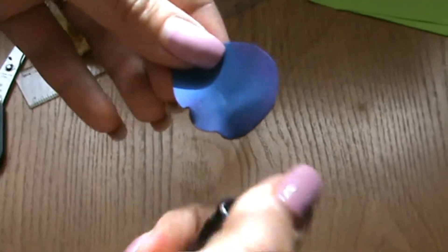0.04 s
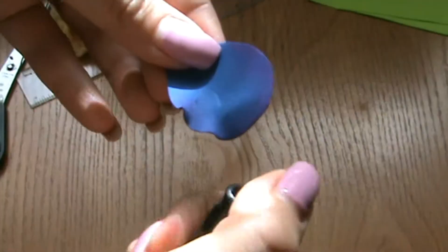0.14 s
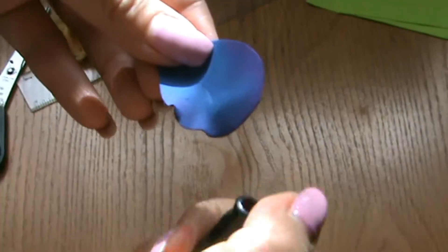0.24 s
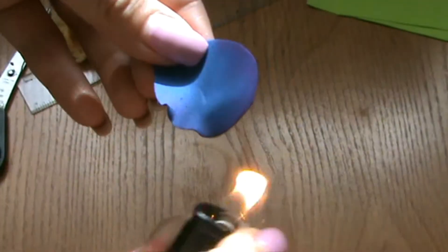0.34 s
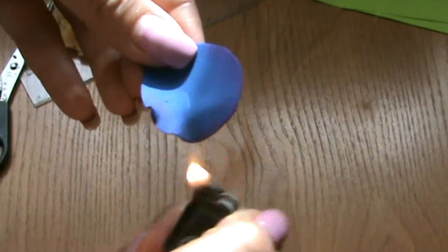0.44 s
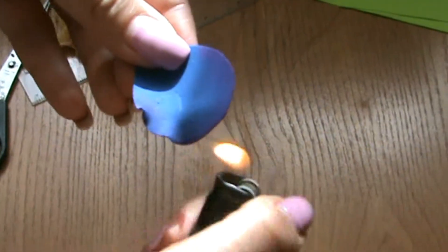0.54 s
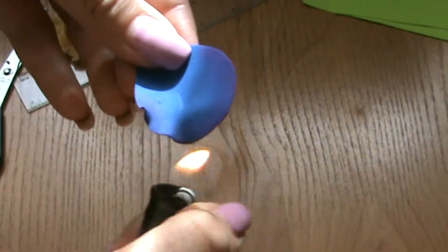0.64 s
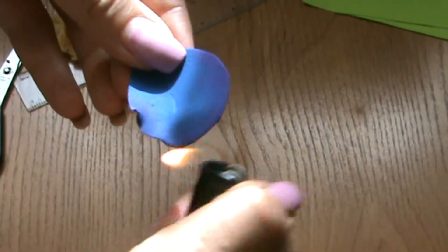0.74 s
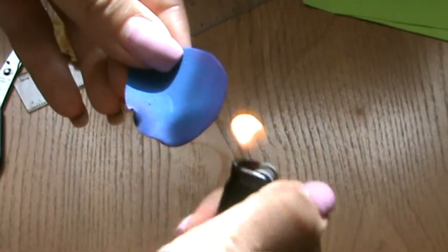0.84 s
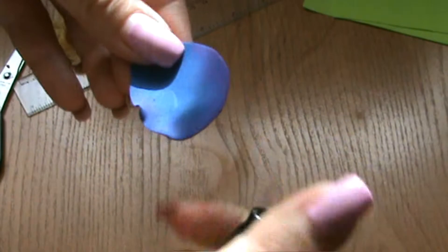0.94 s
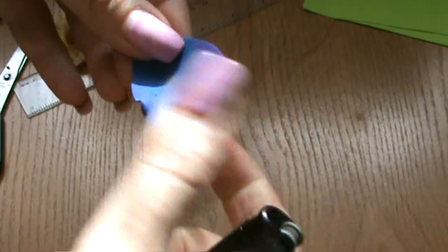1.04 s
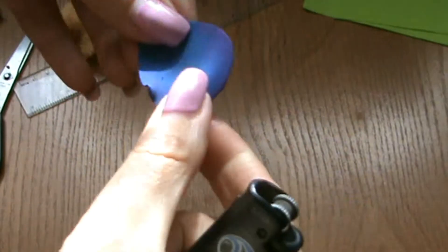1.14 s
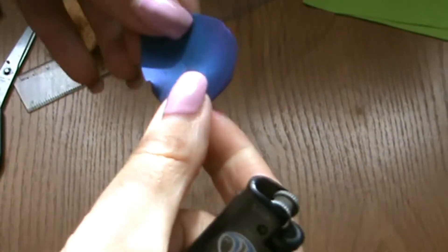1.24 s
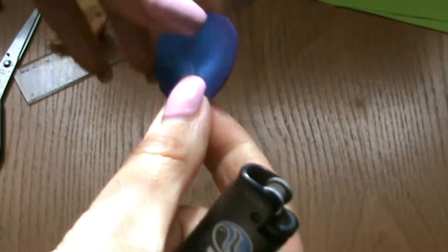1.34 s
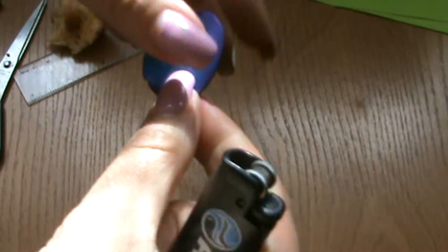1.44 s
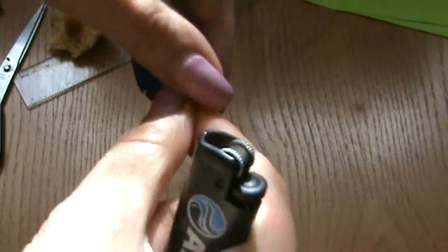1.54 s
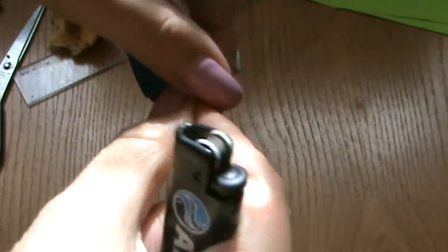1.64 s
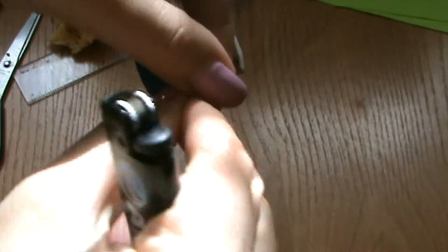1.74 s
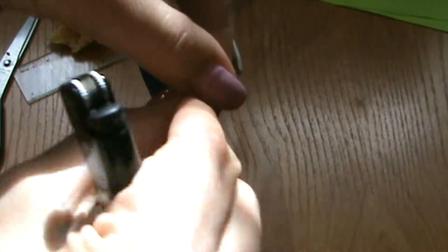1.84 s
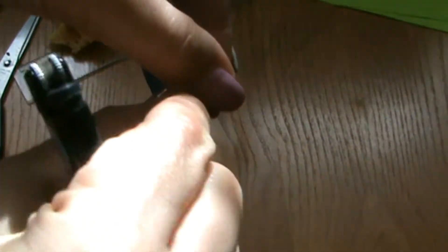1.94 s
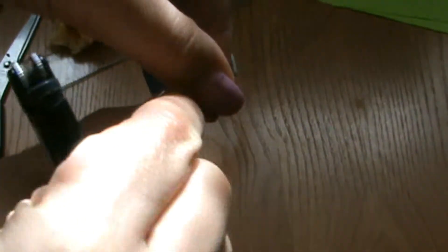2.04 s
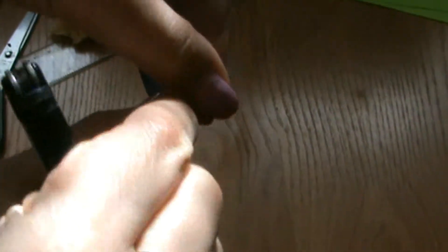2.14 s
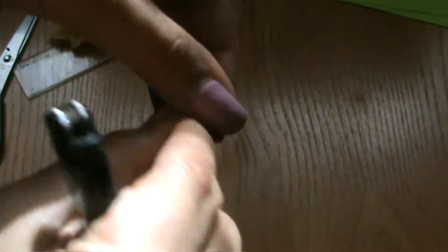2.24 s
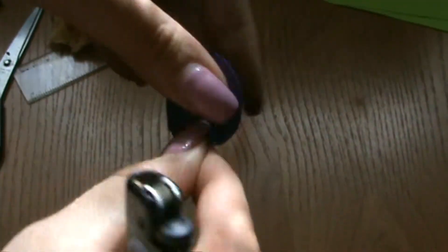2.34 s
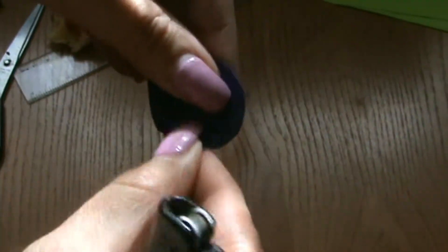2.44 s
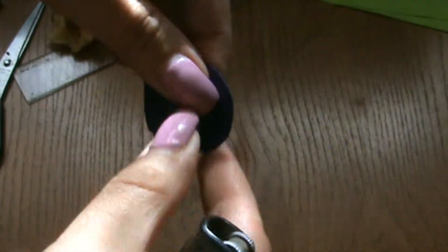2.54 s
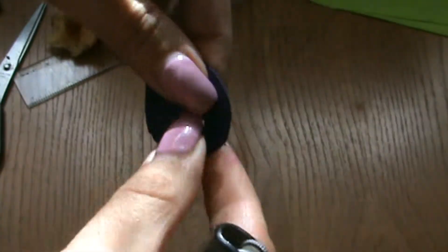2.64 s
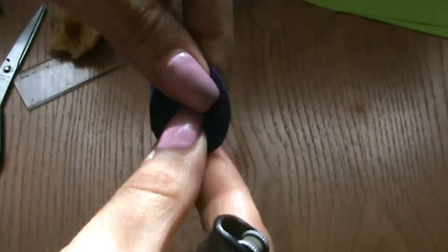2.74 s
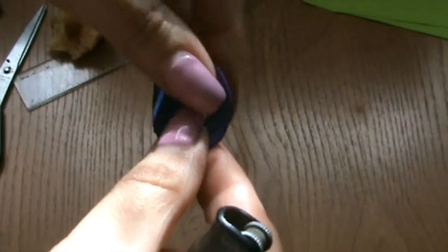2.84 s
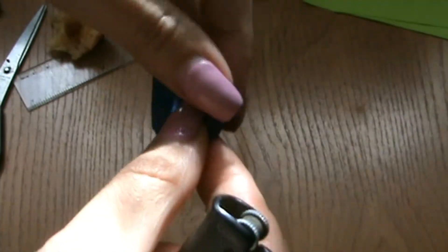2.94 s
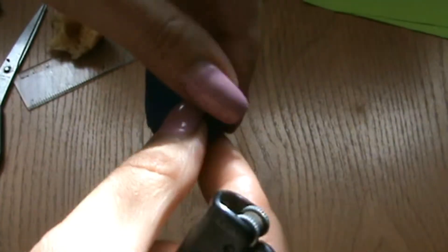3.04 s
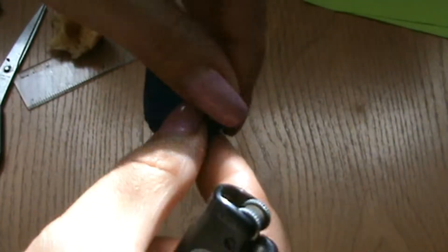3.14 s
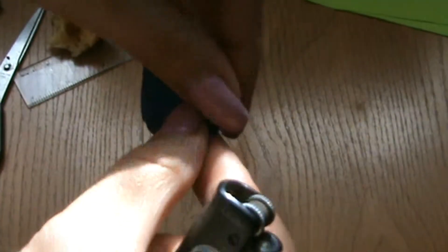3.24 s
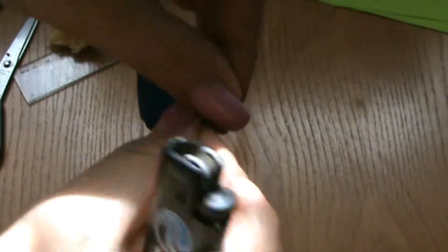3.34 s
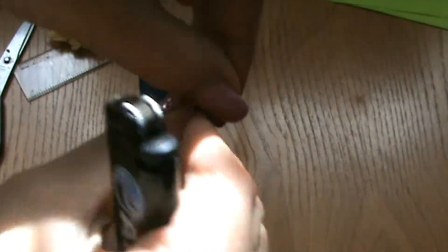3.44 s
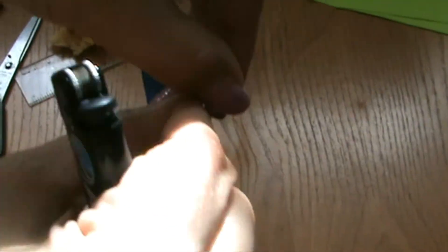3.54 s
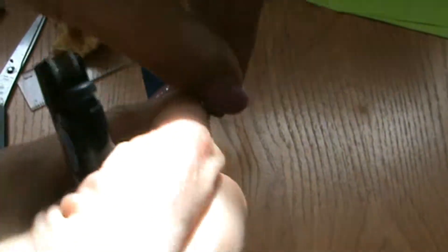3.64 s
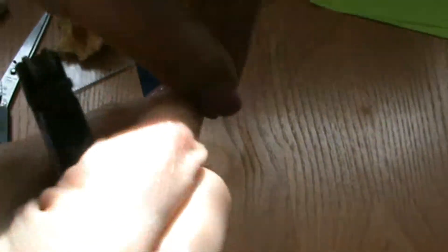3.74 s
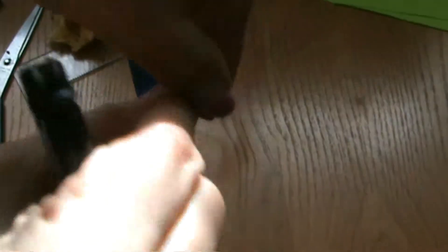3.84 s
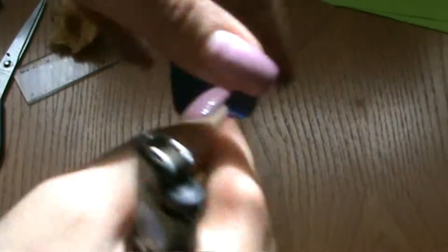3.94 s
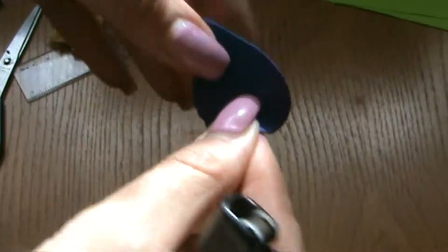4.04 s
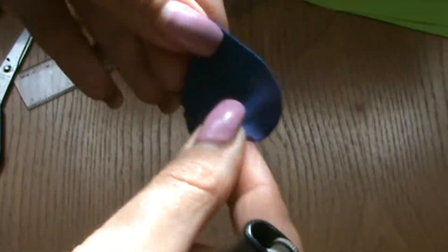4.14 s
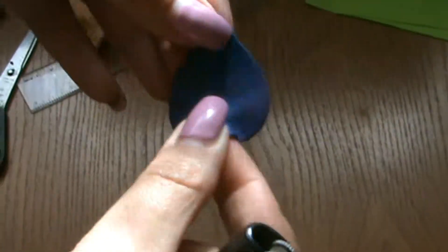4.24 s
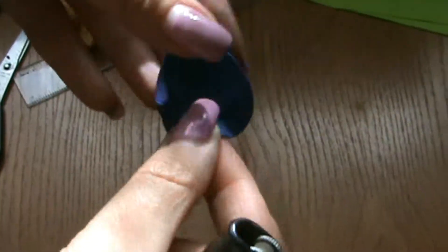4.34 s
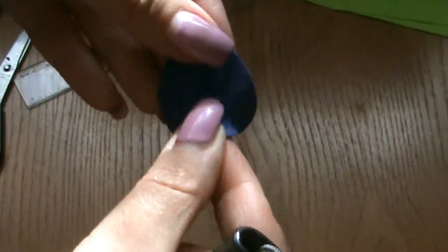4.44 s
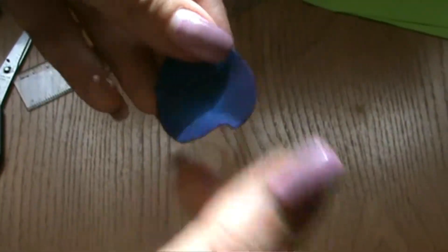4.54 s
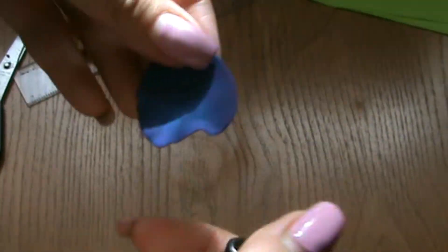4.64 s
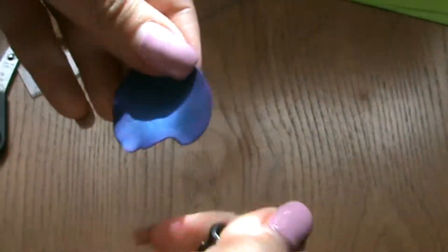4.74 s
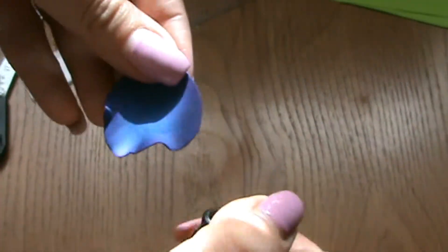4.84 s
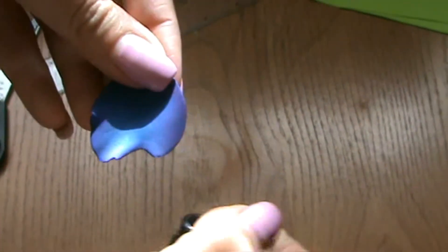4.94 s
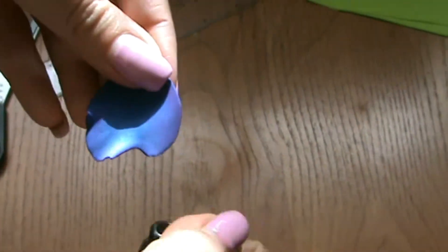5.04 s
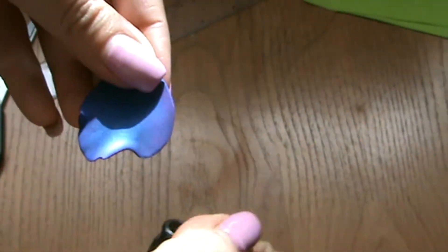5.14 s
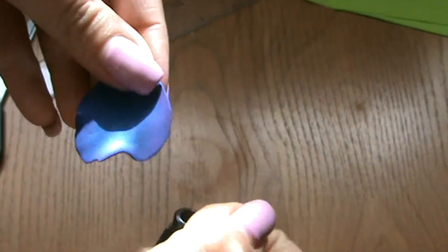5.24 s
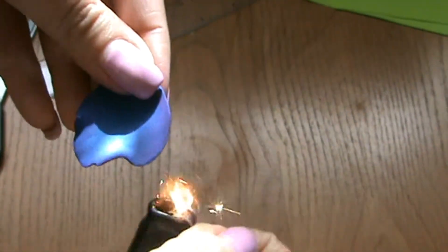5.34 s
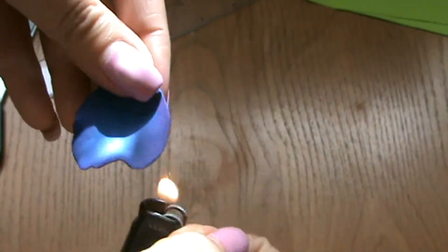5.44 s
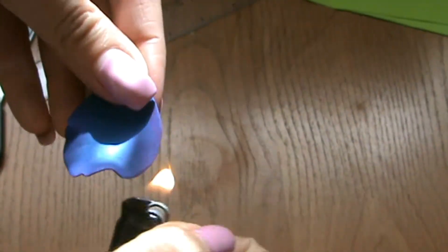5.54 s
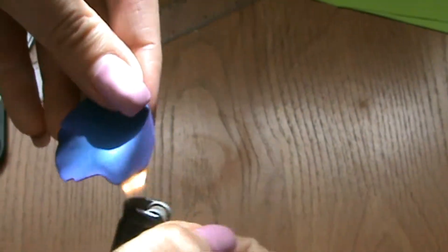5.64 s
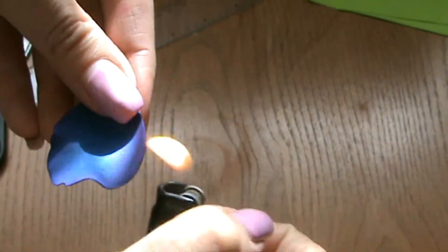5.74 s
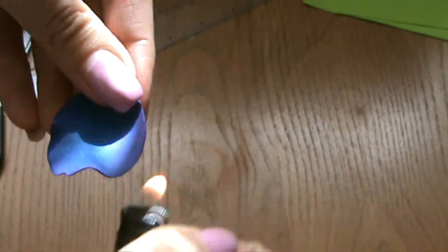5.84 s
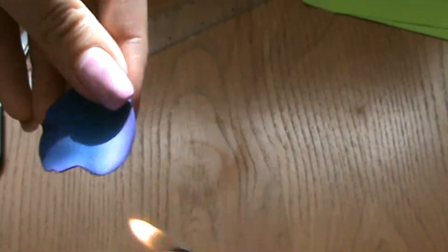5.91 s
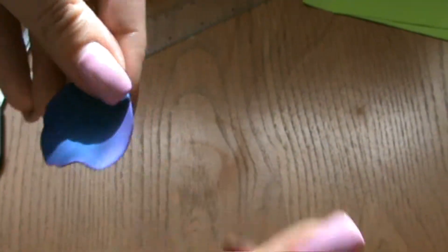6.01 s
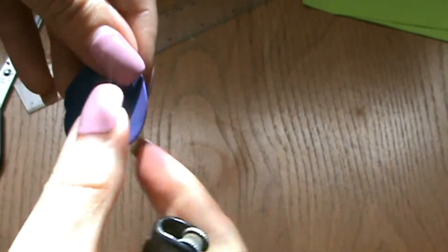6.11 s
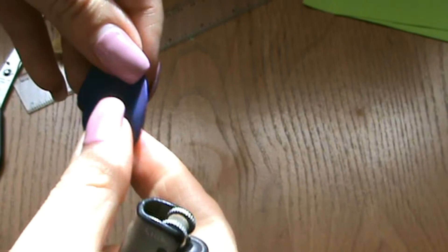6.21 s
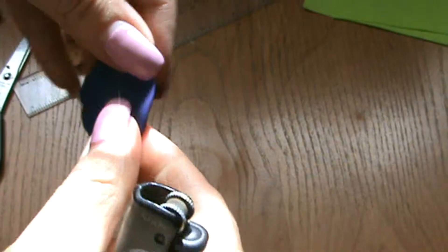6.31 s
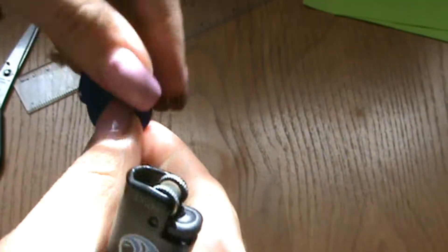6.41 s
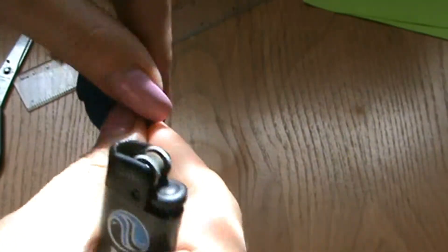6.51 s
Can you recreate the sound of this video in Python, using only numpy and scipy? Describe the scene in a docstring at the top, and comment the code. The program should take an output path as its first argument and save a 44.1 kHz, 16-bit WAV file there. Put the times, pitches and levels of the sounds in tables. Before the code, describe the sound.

At about 0.3 seconds a pocket lighter's steel wheel scrapes over the flint with a short, bright rasp and a sharp snap. The lever thuds down and the gas catches with a small puff, then hisses faintly until the lever clicks shut at 0.95 seconds. After a pause, a light tick at 2.3 seconds leads into brief fingertip rubs on a fabric petal and very soft bumps on a wooden desk. More ticks, rubs and bumps come between 3.9 and 4.5 seconds, with a single click at 4.9. At 5.4 seconds the lighter is struck again, just as sharply, and burns with a faint hiss until 6 seconds, when the lever snaps back and the flame goes out with a soft pop. A few faint rubs follow until 6.4 seconds. Everything is close, in a small room, over low room tone and faint electronic hiss and whine.

```python
"""A flint lighter is lit twice over a wooden desk in a small room, close to a small microphone.
Room tone and faint electronic hiss, whine, ticks and chirps run throughout. At 0.3 s the wheel rasps
over the flint, the lever thuds down and the gas catches with a puff, then hisses until the lever snaps
back at 0.95 s. Fingers and nails pinch a fabric petal and bump softly on the desk. The lighter burns
again from 5.4 to 6 s; a few light rubs follow."""
import sys
import numpy as np
from scipy import signal
from scipy.fft import rfft, irfft
from scipy.io import wavfile
from scipy.ndimage import map_coordinates

SR = 44100
rng = np.random.default_rng(int(sys.argv[2]) if len(sys.argv) > 2 else 0)


def materialize(psi):
    """Save the field psi as 16-bit PCM at rate SR to the path in sys.argv[1].

    A 1-D psi becomes a single channel; in a 2-D psi each row is a channel.
    """
    bounded = np.clip(np.atleast_2d(psi).T, -1, 1)
    quanta = np.round(bounded * 32767).astype(np.int16)
    wavfile.write(sys.argv[1], SR, quanta)


N = 289760

# wheel turns: creep t/s, bite t/s, spin t/s, spin level/dB, bite f/Hz, spin f/Hz, spin width/Hz
WHEEL_TURNS = [(0.262, 0.2995, 0.3285, -21, 4540, 6770, 6000),
               (5.355, 5.352, 5.387, -21.5, 7540, 7470, 5000)]
# lever down: t/s, thud level/dB, flame level/dB, flame front f/Hz, hiss level/dB
LEVER_DOWN = [(0.3251, -22.5, -25.5, 760, -64), (5.3730, -29, -28.5, 1750, -65.5)]
# lever up: t/s, bounce f/Hz, flame-out t/s, flame-out level/dB
LEVER_UP = [(0.9464, 5150, 0.959, -42), (5.978, 6760, 6.0036, -28.5)]
STEEL_GRAIN = dict(grains_per_s=5000, spread_db=3, smooth=.36, skirt_db=-7)


def from_db(db):
    """Decibels to gain."""
    return 10 ** (np.asarray(db) / 20)


def rms_one(x):
    """Scale to unit rms."""
    return x / np.sqrt(np.mean(x ** 2) + 1e-20)


def coloured(x, spectrum, size=4096):
    """Minimum-phase filter through rows of f/Hz, level/dB."""
    hz, db = np.transpose(spectrum)
    grid_hz = np.maximum(np.fft.rfftfreq(size, 1 / SR), 1)
    cepstrum = irfft(np.log(from_db(np.interp(np.log(grid_hz), np.log(hz), db))))
    cepstrum[1:size // 2] *= 2
    cepstrum[size // 2 + 1:] = 0
    return signal.oaconvolve(x, irfft(np.exp(rfft(cepstrum))))[:len(x)]


def resonance(x, hz, width_hz):
    """Two-pole band-pass, unit peak gain."""
    w = 2 * np.pi * hz / SR
    k = np.tan(np.pi * min(width_hz / SR, np.exp(-1)))
    return signal.lfilter([k, 0, -k], [1 + k, -2 * np.cos(w), 1 - k], x + 1e-18)


def skirted_band(x, hz, width_hz, skirt_db):
    """Steep resonance on broader skirts."""
    skirt = resonance(x, hz, width_hz)
    return resonance(skirt, hz, width_hz) + from_db(skirt_db) * skirt


def placed(t_s, sound):
    """Full-length track with the sound starting at t_s."""
    track, start = np.zeros(N), round(t_s * SR)
    first, last = max(start, 0), min(start + len(sound), N)
    track[first:last] = sound[first - start:last - start]
    return track


def burst(t_s, db, hz, width_hz, rise_s, fall_s, grains_per_s, spread_db, smooth, skirt_db, size=16384):
    """Swell of tiny random impacts on smooth noise, peaking at t_s."""
    t = (np.arange(size) - size // 2) / SR
    strengths = from_db(spread_db * np.minimum(rng.exponential(1, size), np.pi))
    signs = rng.choice([-1, 1], size)
    hits = rng.random(size) < grains_per_s / SR
    grains = rms_one(strengths * signs * hits) + smooth * rng.standard_normal(size)
    swell = np.exp(-np.abs(t) / np.where(t < 0, rise_s, fall_s))
    sound = skirted_band(grains * swell, hz, width_hz, skirt_db)
    return placed(t_s + t[0], from_db(db) * rms_one(sound) * np.sqrt(np.mean(swell ** 2)))


def click(t_s, db, hz, width_hz, decay_s, crest_db=5.5, size=2048):
    """Hard contact: a fast-decaying crack of noise."""
    fade = np.exp(-np.arange(size) / SR / decay_s)
    crack = skirted_band(rng.standard_normal(size) * fade, hz, width_hz, skirt_db=-5)
    return placed(t_s, from_db(db - crest_db) * rms_one(crack) * np.sqrt(np.mean(fade ** 2)))


def thud(t_s, db, hz, t60_s, size=4096):
    """Heavily damped low pressure pulse."""
    t = np.arange(size) / SR
    return placed(t_s, from_db(db) * np.sin(2 * np.pi * hz * t) * np.exp(-np.log(1000) * t / t60_s))


def background(mid_db, side_db, ripple_hz, ripple_db):
    """Room tone and microphone hiss with steady whine and subsonic ripple."""
    # noise spectra, common and opposed in the two channels: f/Hz, level/dB
    mid_spectrum = [(20, -13), (40, -13), (65, -17), (130, -16.5), (200, -12.5), (300, -17), (450, -14.5),
                    (800, -22.5), (2000, -21), (5000, -24), (15500, -25.5)]
    side_spectrum = [(18, -80), (30, -60), (48, -41), (114, -13.5), (213, -9), (359, -5), (1330, -4),
                     (1550, -5), (1720, -4.5), (15500, -26)]
    # electronic tones: f/Hz, level/dB
    whine = [(38.4, -78.5), (154, -82.5), (218, -82.5), (12281.5, -75), (13285.5, -82.5), (14287, -84)]
    t = np.arange(N) / SR
    mid = from_db(mid_db) * rms_one(coloured(rng.standard_normal(N), mid_spectrum))
    side = from_db(side_db) * rms_one(coloured(rng.standard_normal(N), side_spectrum))
    tones = sum(np.sqrt(2) * from_db(db) * np.sin(2 * np.pi * hz * t)
                for hz, db in whine + [(ripple_hz, ripple_db)])
    return mid + tones + np.array([side, -side])


def ticking(db, period_s, hz, width_hz, spread_db=18, offbeat_db=-8, start_s=.001):
    """Uneven puffs of electronic noise on a steady beat, alternate ones weaker."""
    beats = (np.arange(start_s, N / SR - period_s, period_s) * SR).astype(int)
    offbeat = np.arange(len(beats)) % 2 == 0
    pulses = np.zeros(N)
    pulses[beats] = from_db(spread_db * rng.random(len(beats)) + offbeat_db * offbeat)
    puffs = signal.oaconvolve(pulses, np.hanning(400), "same") * rng.standard_normal(N)
    return from_db(db) * rms_one(resonance(resonance(puffs, hz, width_hz), hz, width_hz))


def chirping(pitch_spread, spread_db, tries=128):
    """Faint electronic blips, random in time, pitch and strength."""
    # blip trains: f/Hz, level/dB, rate/(1/s), length/s
    trains = [(1400, -83, 11, .016), (1610, -82.5, 11, .015), (3560, -85, 14, .04)]
    out = np.zeros(N)
    for hz, db, per_s, length_s in trains:
        blips, t = np.zeros(N), np.arange(0, length_s, 1 / SR)
        for when, detune, strength, chance in rng.random((tries, 4)):
            if chance * tries < per_s * N / SR:
                tone = np.sin(2 * np.pi * hz * (1 + pitch_spread * (detune - .5)) * t)
                blip = from_db(spread_db * strength) * np.hanning(len(t)) * tone
                blips += placed(when * (N / SR - length_s), blip)
        out += from_db(db) * rms_one(blips)
    return out


def stray_clicks():
    """Nails and lighter tick in handling."""
    # contacts: t/s, level/dB, f/Hz, width/Hz, decay/s
    contacts = [(0.2587, -32, 7000, 8000, 0.00062), (0.4, -40, 3880, 12200, 0.0028),
                (0.4153, -32, 8000, 12000, .0006), (2.3019, -35.5, 5250, 11400, 0.002),
                (3.96, -31.5, 4450, 13600, 0.0014), (4.1, -46, 5500, 4000, .002),
                (4.9300, -36.5, 5230, 4000, 0.0027), (5.41, -38, 5000, 9000, .0006),
                (5.8940, -48, 3200, 3500, .0018), (6.371, -48, 5000, 6000, .0017)]
    return sum(click(*contact) for contact in contacts)


def wheel_rasp():
    """Steel wheel on flint: faint creep, squeaky bite and drag, loud spin, short skid."""
    out = np.zeros(N)
    for creep_s, bite_s, spin_s, spin_db, bite_hz, spin_hz, spin_width_hz in WHEEL_TURNS:
        squeak = dict(hz=bite_hz, width_hz=.15 * bite_hz, **STEEL_GRAIN)
        creep = burst(creep_s, db=-53.5, hz=5500, width_hz=5800, rise_s=.025, fall_s=.025, **STEEL_GRAIN)
        bite = burst(bite_s, db=-37.5, rise_s=.0037, fall_s=.0039, **squeak)
        drag = burst(bite_s + .014, db=-39.5, rise_s=.014, fall_s=.014, **squeak)
        spin = burst(spin_s, spin_db, spin_hz, spin_width_hz, rise_s=.0081, fall_s=.006, **STEEL_GRAIN)
        skid = burst(spin_s + .0135, db=-32.5, hz=6450, width_hz=5700, rise_s=.0022, fall_s=.0064,
                     **STEEL_GRAIN)
        out += creep + bite + drag + spin + skid
    return out


def hood(x, ring_db):
    """Steel hood and wheel ring briefly when shaken."""
    # steel modes: f/Hz, width/Hz, level/dB
    modes = [(3800, 80, 0), (4205, 105, 5), (4520, 70, 1), (5500, 88, 5), (6100, 86, 3), (6300, 70, -1),
             (7460, 33, -1), (8450, 110, -1), (9290, 120, 10.5), (9810, 140, 11)]
    return x + from_db(ring_db) * sum(from_db(db) * resonance(x, hz, width) for hz, width, db in modes)


def lever_slide():
    """The gas lever scrapes on its way down."""
    return sum(burst(t_s, db=-30.5, hz=5800, width_hz=2800, rise_s=.0033, fall_s=.0033, **STEEL_GRAIN)
               for t_s, *_ in LEVER_DOWN)


def lever_thud():
    """The gas lever bottoms."""
    return sum(thud(t_s, db, hz=370, t60_s=.009) for t_s, db, *_ in LEVER_DOWN)


def gas_jet(start_hz, settled_hz, settle_s, ramp_s, tone_width_hz):
    """Hiss while the lever is held; the breathy edge tone climbs and settles as the valve opens."""
    # hiss spectrum: f/Hz, level/dB
    spectrum = [(200, -43), (1200, -11.5), (2000, -6), (2600, 0.5), (3000, -2), (3600, -4), (4500, -12),
                (5300, -11.5), (6000, -21), (8000, -28), (15000, -42)]
    # edge tone partials: frequency ratio, level/dB re hiss
    partials = [(.83, -21), (1, -6), (1.67, -24)]
    t = np.arange(N) / SR
    flow, pitch_hz = np.zeros(N), np.full(N, float(start_hz))
    for (open_s, *_, hiss_db), (close_s, *_) in zip(LEVER_DOWN, LEVER_UP):
        flow += from_db(hiss_db) * np.clip(np.minimum(t - open_s, close_s - t) / ramp_s, 0, 1)
        remaining = np.exp(-np.maximum(t - open_s, 0) / settle_s)
        pitch_hz = np.where(t > open_s, settled_hz + (start_hz - settled_hz) * remaining, pitch_hz)
    phase = 2 * np.pi * np.cumsum(pitch_hz) / SR
    hiss = rms_one(coloured(rng.standard_normal(N), spectrum))
    low_pass = signal.butter(2, tone_width_hz / 2, fs=SR, output="sos")
    for ratio, db in partials:
        in_phase, quadrature = signal.sosfilt(low_pass, rng.standard_normal((2, N)))
        tone = in_phase * np.cos(ratio * phase) + quadrature * np.sin(ratio * phase)
        hiss += from_db(db) * rms_one(tone)
    return flow * rms_one(hiss)


def wheel_snaps():
    """A chip of flint breaks off, then the wheel stops with a snap."""
    out = np.zeros(N)
    for _, _, spin_s, _, _, spin_hz, _ in WHEEL_TURNS:
        out += click(spin_s + .003, db=-21, hz=spin_hz, width_hz=6600, decay_s=.00053)
        out += click(spin_s + .0135, db=-16.5, hz=6450, width_hz=12600, decay_s=.00063)
    return out


def flame(catch_lag_s):
    """The front crackles, the gas catches with a pulse and a puff; the flame dies with a flutter."""
    turbulence = dict(grains_per_s=1500, spread_db=11, smooth=.46, skirt_db=1)
    puff_noise = dict(hz=368, width_hz=750, **turbulence)
    out = np.zeros(N)
    for press_s, _, db, front_hz, _ in LEVER_DOWN:
        catch_s = press_s + catch_lag_s
        front = burst(catch_s - .008, db - 14, front_hz, width_hz=1000, rise_s=.0048, fall_s=.0082,
                      **turbulence)
        puff = burst(catch_s + .0055, db - 9, rise_s=.0022, fall_s=.0037, **puff_noise)
        out += front + thud(catch_s, db, hz=186, t60_s=.024) + puff
    for _, _, out_s, db in LEVER_UP:
        flutter = burst(out_s, db - 21.5, rise_s=.0046, fall_s=.0046, **puff_noise)
        out += thud(out_s, db, hz=91, t60_s=.012) + flutter
    return out


def lever_release(bounce_s, loss_db):
    """The sprung lever unsticks, snaps shut and bounces twice."""
    out = np.zeros(N)
    for t_s, bounce_hz, *_ in LEVER_UP:
        out += click(t_s - .0058, db=-45, hz=6000, width_hz=2200, decay_s=.0025)
        out += click(t_s, db=-26.5, hz=8000, width_hz=2400, decay_s=.0011)
        for k in range(2):
            out += click(t_s + (k + 1) * bounce_s, db=-33.5 - k * loss_db, hz=bounce_hz,
                         width_hz=4600, decay_s=.0021)
    return out


def fabric_rubs():
    """Fingers and nails rub the fabric petal."""
    # rubs: peak t/s, level/dB, rise/s, f/Hz
    rubs = [(1.305, -61, .016, 7500), (1.550, -57.5, .014, 6000), (2.433, -52.5, 0.013, 6900),
            (2.499, -47, 0.008, 6800), (2.536, -44.5, 0.0088, 5570), (3.090, -62.5, 0.01, 7000),
            (3.945, -59, 0.037, 6400), (4.110, -53.5, 0.014, 6040), (4.190, -61, 0.034, 6000),
            (4.240, -57.5, 0.013, 4860), (4.310, -41, 0.0067, 6900), (4.429, -60, .007, 6000),
            (4.521, -45, 0.006, 6830), (6.020, -56.5, 0.014, 5640), (6.235, -63, .01, 7000),
            (6.378, -57.5, 0.013, 5440)]
    grain = dict(grains_per_s=4300, spread_db=6, smooth=.94, skirt_db=-4.5)
    return sum(burst(t_s, db, hz, width_hz=5000, rise_s=rise_s, fall_s=.93 * rise_s, **grain)
               for t_s, db, rise_s, hz in rubs)


def desk_bumps():
    """Fingers and hands bump softly on the desk."""
    # bumps: peak t/s, level/dB, f/Hz
    bumps = [(2.438, -64.5, 910), (2.520, -58.5, 950), (2.545, -61, 110), (4.124, -62.5, 160),
             (4.234, -57, 674), (4.320, -63.5, 120), (4.518, -63.5, 595)]
    grain = dict(grains_per_s=790, spread_db=6, smooth=.41, skirt_db=-7)
    return sum(burst(*bump, width_hz=520, rise_s=.015, fall_s=.015, **grain) for bump in bumps)


def desk(x, echo_db):
    """Desk echo; its comb of peaks slides as the lighter moves."""
    # echo path: t/s, lag/s
    path = [(0.33, 0.0023), (0.65, 0.0018), (0.95, 0.002), (5.40, 0.0022), (5.62, 0.0023), (5.76, 0.0023),
            (5.98, 0.0029)]
    n = np.arange(N)
    lag_samples = np.interp(n / SR, *np.transpose(path)) * SR
    echo = map_coordinates(x, [n - lag_samples], order=3)
    return (x + from_db(echo_db) * echo) / np.hypot(1, from_db(echo_db))


def bass_roll_off(x, hz):
    """The small microphone loses the deepest bass."""
    return signal.sosfilt(signal.butter(2, hz, "high", fs=SR, output="sos"), x)


def ports(x, lag_samples):
    """An off-centre source reaches one microphone port later."""
    lead = np.exp(1j * np.pi * np.fft.rfftfreq(N) * lag_samples)
    return irfft(rfft(x) * np.array([lead, 1 / lead]), N)


def room(x, tail_db, t60_s, build_s, side_db, size=22050):
    """Short diffuse tail, slightly different at each port, plus low standing waves."""
    # tail spectrum: f/Hz, level/dB
    spectrum = [(100, -5), (300, 5.5), (1000, -10.5), (3000, -0.5), (6500, -1.5), (9000, -7.5),
                (15000, -13)]
    # standing waves: f/Hz, t60/s, level/dB
    modes = [(176, 0.29, -3), (198, 0.32, 4.5), (219, 0.26, 3.5), (255, 0.36, -4), (288, 0.35, 3),
             (353, 0.32, -12)]
    t = np.arange(size) / SR
    fade = np.exp(-np.log(1000) * t / t60_s) * (1 - np.exp(-t / build_s))
    tails = [rms_one(coloured(rng.standard_normal(size) * fade, spectrum)) for _ in range(2)]
    mid, side = (from_db(tail_db) * signal.oaconvolve(x, tail / np.sqrt(size))[:N] for tail in tails)
    boom = sum(from_db(db) * resonance(x, hz, np.log(1000) / (np.pi * t60)) for hz, t60, db in modes)
    return mid + boom + from_db(side_db) * np.array([side, -side])


def scene():
    """Lighter and hands over the desk, in the room, on the noise floor; stereo."""
    # colour of scrapes, clicks and rubs: f/Hz, level/dB
    contact_spectrum = [(100, -21), (600, 14), (1800, 3.5), (3000, 2.5), (4500, -2), (6500, 0),
                        (10000, -2.5), (11300, -5), (12800, -13), (15500, -1)]
    scrapes = wheel_rasp() + lever_slide()
    fingers = fabric_rubs()
    clicks = wheel_snaps() + lever_release(bounce_s=.003, loss_db=2.5) + stray_clicks()
    contacts = coloured(hood(scrapes + clicks, ring_db=-4.5) + fingers, contact_spectrum)
    lows = lever_thud() + desk_bumps() + flame(catch_lag_s=.0235)
    jet = gas_jet(start_hz=2660, settled_hz=3014, settle_s=.15, ramp_s=.013, tone_width_hz=130)
    close = desk(contacts, echo_db=-17.5) + desk(jet, echo_db=-17) + bass_roll_off(lows, hz=35)
    ticks = ticking(db=-78, period_s=.04, hz=1520, width_hz=520)
    chirps = chirping(pitch_spread=.059, spread_db=-6)
    reverb = room(close, tail_db=-13, t60_s=.15, build_s=.001, side_db=-16.5)
    floor = background(mid_db=-64.5, side_db=-61.5, ripple_hz=12.785, ripple_db=-59.5)
    return ports(close, lag_samples=.3) + reverb + ticks + chirps + floor


def record(dry):
    """Steep treble cut."""
    cutoff_hz = 15900
    return signal.sosfilt(signal.ellip(12, .1, 70, cutoff_hz, fs=SR, output="sos"), dry)


dry = scene()
out = record(dry)
materialize(out)
```